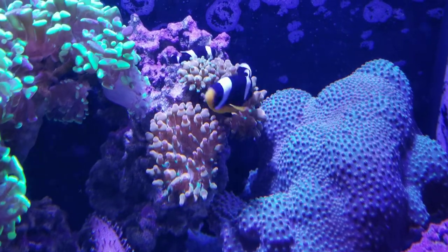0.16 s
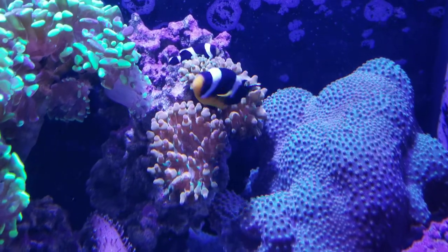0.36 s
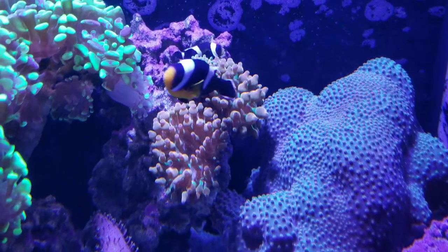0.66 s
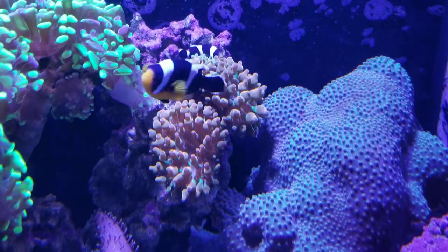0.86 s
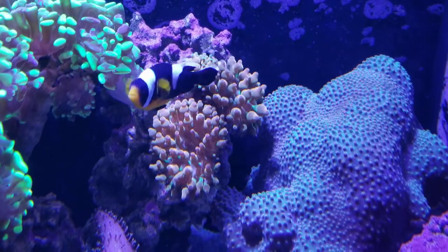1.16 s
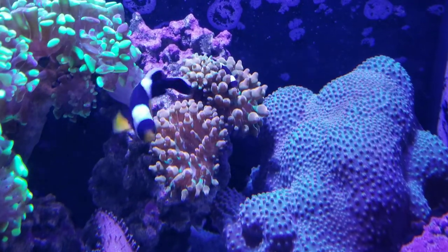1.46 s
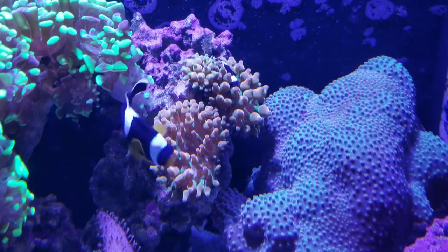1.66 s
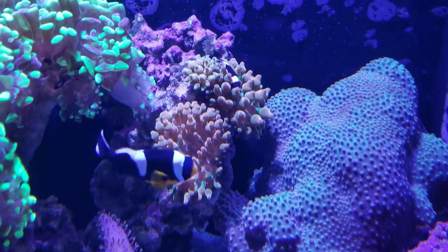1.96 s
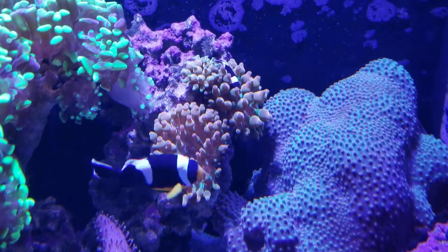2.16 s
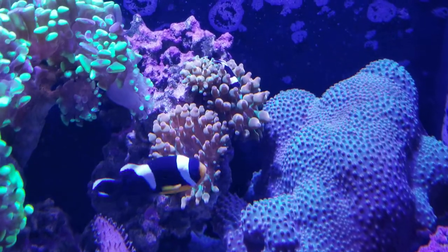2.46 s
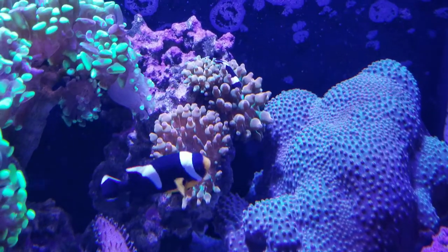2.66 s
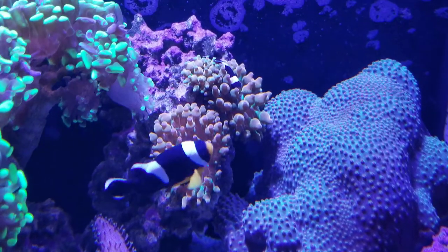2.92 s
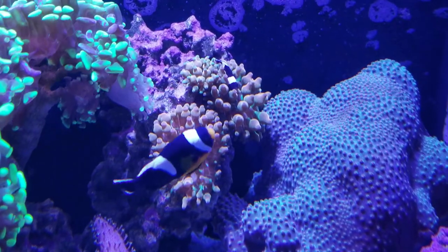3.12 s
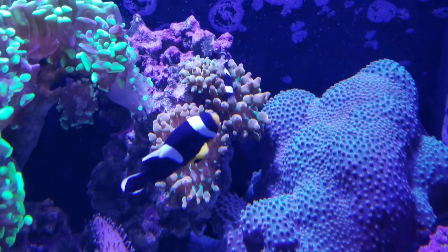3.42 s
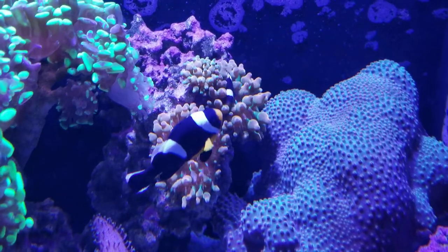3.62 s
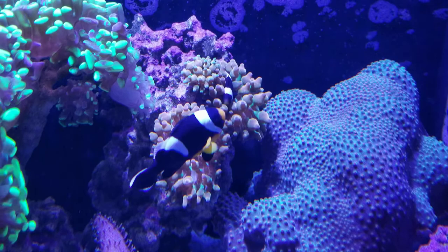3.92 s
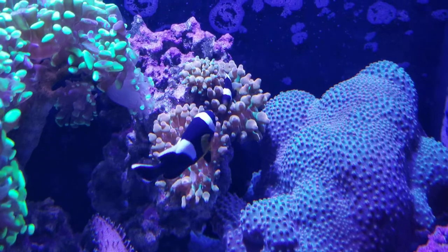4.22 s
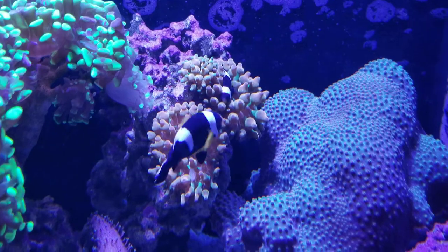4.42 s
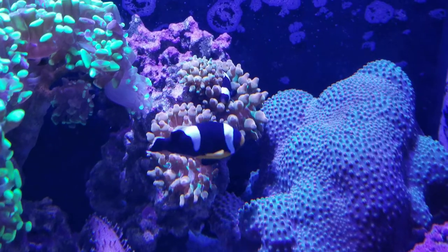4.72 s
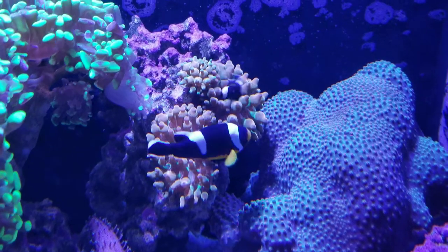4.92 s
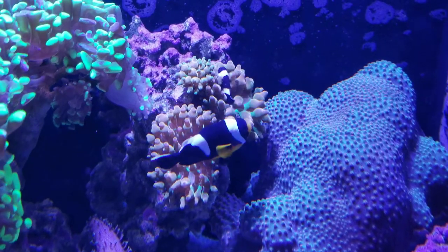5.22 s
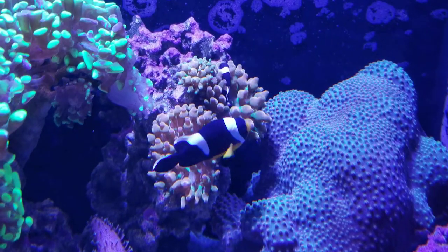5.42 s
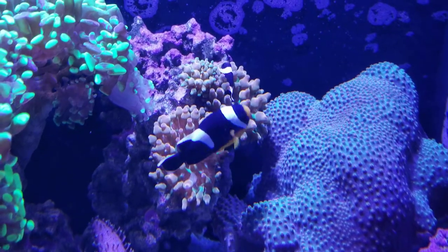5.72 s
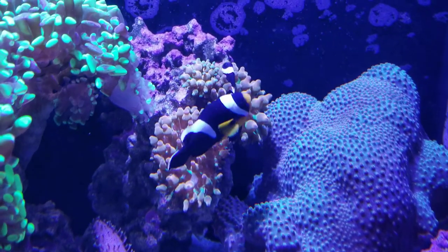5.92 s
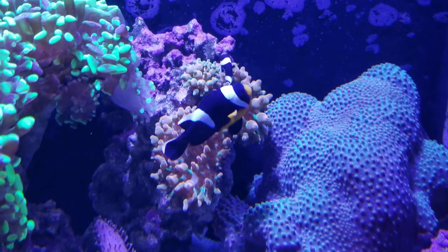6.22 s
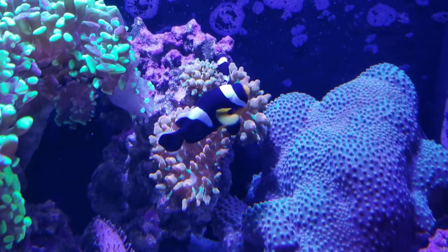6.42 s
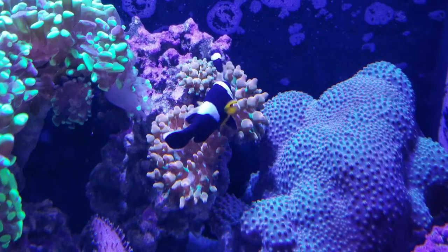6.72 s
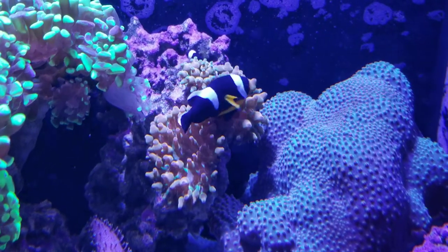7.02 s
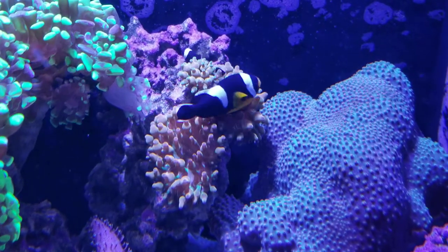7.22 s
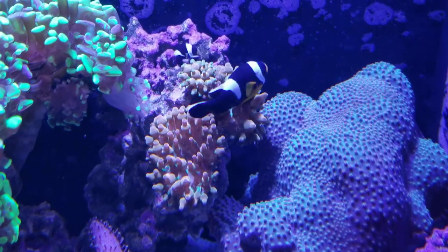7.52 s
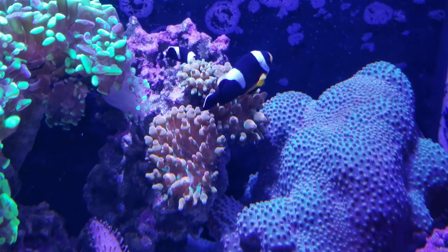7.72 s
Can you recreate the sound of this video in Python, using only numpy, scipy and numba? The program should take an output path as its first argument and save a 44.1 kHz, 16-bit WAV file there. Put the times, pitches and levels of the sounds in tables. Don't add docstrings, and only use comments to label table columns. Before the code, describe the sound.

Water rushes continuously over a low mains hum beside a fish tank, with a buzzing impeller rattle, small high plinks and crisp spray ticks.

```python
import sys
import numpy as np
from scipy import signal
from scipy.fft import rfft, irfft
from scipy.io import wavfile
from scipy.ndimage import uniform_filter1d
from numba import njit

SR = 44100
rng = np.random.default_rng(int(sys.argv[2]) if len(sys.argv) > 2 else 0)


def log_audio(samples):
    frames = np.atleast_2d(samples).T
    limited = np.clip(frames, -1, 1)
    pcm = np.round(limited * 32767).astype(np.int16)
    wavfile.write(sys.argv[1], SR, pcm)


def invert_db(level):
    return 10 ** (np.asarray(level, dtype=float) / 20)


N = 347067
T = np.arange(N) / SR
HZ = np.maximum(np.fft.rfftfreq(N, 1 / SR), 1)

MAINS_HZ, ROTOR_HZ = 60.02, 59.8
SKIP_S, SKIP_CYCLES = 4.012, -.585
RUSH_DB, FIZZ_DB = -41.5, -50
KNOCK_DB, KNOCK_SCATTER_DB, KNOCK_TOP_DB, BACKSTROKE_DB = -30, 6, -20.5, -8.5
HOUSING_HZ, HOUSING_SPREAD_HZ = 2761, 98
PARTNER_HZ, PARTNER_DB, PARTNER_LEAD_S = 123, -1.5, 0.001799
TOP_HZ = 15900

HUM_MULTIPLES = (2, 4, 6, 13, 14, 19, 31, 32, 34, 35, 38)
# level/dB, left minus right/dB
HUM_LINES = [(-41.5, 5.5), (-58.5, 9.5), (-71.5, 24.5), (-81.5, -4), (-73, 18), (-74, 19), (-82, 4),
             (-77, 16), (-74, 2), (-81, 6), (-90, -3)]
# t/s, level/dB
ROTOR_BEAT = [(0.0, -44), (0.15, -49), (0.2, -63), (0.63, -47), (1.05, -60), (1.14, -48), (1.49, -66),
              (1.71, -40), (1.82, -58), (1.88, -45.5), (2.96, -56), (3.6, -44), (4.82, -55.5),
              (5.94, -43.5), (6.14, -53), (7.06, -61), (7.26, -45.5), (7.87, -51)]
# t/s, flow level/dB, splashing level/dB
WATER_FLOW = [
    (0.0, -1, -0.5),
    (1.1, .5, 0),
    (1.75, -.5, 3.5),
    (2.5, 1, 3.5),
    (3.7, 0.5, 4.5),
    (4.2, 0, 1),
    (5.3, .5, 1.5),
    (6.8, 0, 4),
    (7.87, 1, -0.5),
]
# f/Hz, level/dB per Hz
RUSH_SPECTRUM = [(11, -50), (18, -28), (69, -5.5), (122, -8), (143, -4), (168, -7), (246, -14),
                 (289, -19.5), (497, -18), (607, -13.5), (908, -23), (1050, -19.5), (1440, -25),
                 (1730, -23), (2200, -36), (2860, -78), (4840, -120)]
# f/Hz, level/dB per Hz
FIZZ_SPECTRUM = [(1180, -19), (2000, -9), (2320, -6.5), (2590, -3.5), (2770, -5.5), (3160, -5.5),
                 (3780, -11.5), (5620, -15.5), (6970, -12), (8500, -27), (9420, -24.5), (12700, -9.5),
                 (13400, -11.5), (15700, -24)]
# f/Hz, width/Hz, lift/dB
CABINET_MODES = [(36, 5.5, 8), (93, 2.5, 3), (288, 20, -3), (364, 29, 4.5), (433, 12, -7.5), (904, 19, 1),
                 (162, 10, 1.5), (161.2, 3.6, 7), (205, 31, 4), (274, 5.7, 6), (311, 14, 5), (427, 29, 4.5),
                 (455, 14, 4), (521, 6.7, 5.5), (598, 15, 6.5), (635.4, 9.4, 5), (673, 15, 3.5),
                 (707, 27, 5.5), (849, 31, 1.5), (882, 12, 0.5), (933, 17, -8.5), (945, 27, 4.5),
                 (1059, 42, 4.5), (1060, 9.3, -1.5), (1194, 17, 7), (1190, 22, -0.5), (1302, 21, 3.5),
                 (1596, 8.9, 2), (1622, 22, 6), (1760, 46, 6)]
# f/Hz, left minus right/dB, likeness/0-1, left lead/rad
PORT_PAIR = [(30, 2.5, .95, -.2), (200, 4, .88, -.4), (400, 2.5, .7, 0), (600, 8, .7, .6),
             (1200, 4, .35, -2.5), (1370, 9, .3, -3), (1770, 10, .3, -3.5), (2750, 13, .4, -8),
             (3300, 10, .2, -10), (5800, 7, .15, -10), (7600, 16, .1, -10), (10400, 12, .1, -10),
             (12600, 18, .1, -10), (15500, 10, .1, -10)]
# f/Hz, level/dB
MIC_INLET = [(7400, 1.5), (8800, 6), (10500, -1.5), (12500, 0), (13800, -1), (15500, -10)]
# f/Hz, level/dB
BASS_CUT = [(10, -14), (26, -6), (34, -0.5)]
# t/s, peak level/dB
HARD_KNOCKS = [(0.055, -42.5), (0.068, -42), (0.451, -52), (0.4688, -44), (0.7006, -42), (0.819, -44),
               (0.8679, -44), (0.9832, -41.5), (1.4493, -44), (1.5015, -44.5), (1.6427, -43), (1.817, -44),
               (2.3835, -38), (2.816, -42), (3.684, -43), (4.0602, -42), (4.5765, -43.5), (4.677, -39.5),
               (4.96, -42), (5.012, -39.5), (5.4463, -41), (5.6605, -41), (5.711, -43), (6.094, -39.5),
               (6.126, -42.5), (6.2771, -47), (6.808, -44.5), (6.8924, -43), (6.9426, -42), (7.0269, -44)]
# t/s, peak level/dB, f/Hz
CLEAR_BUBBLES = [(0.474, -41, 6700), (0.5933, -42, 7300), (0.6978, -44.5, 6900), (0.7885, -44, 6900),
                 (0.9672, -43.5, 6350), (1.1563, -48, 7000), (1.957, -44.5, 6060), (1.9919, -43, 6760),
                 (2.3116, -45, 6800), (2.4229, -43, 6750), (2.443, -37, 7030), (2.5731, -46, 6720),
                 (2.7671, -47, 6960), (3.1467, -47, 5970), (3.1762, -47, 7590), (3.5982, -50, 6000),
                 (3.66, -45, 6700), (4.0817, -46, 6760), (4.6902, -48, 6370), (4.7471, -38, 6800),
                 (4.9252, -50, 7560), (5.6665, -41, 6100), (5.8694, -41, 7120), (6.2267, -42, 6700),
                 (6.44, -41, 6800), (6.7555, -47, 6790), (6.772, -44, 6770), (7.2733, -44, 7300),
                 (7.424, -47, 7760), (7.8356, -46, 6760),
                 (0.0074, -44, 5240), (1.1074, -47, 4690), (2.2613, -51, 5210), (2.8744, -50, 5210),
                 (3.264, -43, 4200), (3.3054, -48, 4220), (3.8564, -43, 4470), (4.3944, -51, 5200),
                 (4.5765, -44, 4600), (4.7172, -49, 4760), (5.215, -52, 4100), (5.4296, -47, 5200),
                 (5.662, -45, 4660), (5.9519, -47, 5200), (6.0092, -50, 4450), (6.3999, -48, 4930),
                 (7.236, -46, 5030), (7.4594, -41, 4160), (7.6929, -51, 4240), (7.7558, -50, 5100)]
# t/s, peak level/dB, f/Hz
STRONG_SPRAY = [(0.2802, -40, 12400), (1.2047, -45, 12400), (1.3838, -40, 11900), (1.5933, -41, 13400),
                (1.6856, -42, 12000), (2.3231, -41, 12200), (2.4548, -36, 12700), (2.6247, -35, 11900),
                (2.7806, -30.5, 12400), (2.9956, -43, 11900), (3.0131, -40, 13100), (3.063, -34.5, 12600),
                (3.1303, -48, 12300), (3.26, -41, 12700), (3.4276, -39, 12300), (3.4705, -39, 13300),
                (3.485, -32, 12900), (3.6416, -35, 13600), (3.7193, -42, 10400), (3.7594, -41, 12100),
                (4.9801, -45, 12300), (5.1577, -40.5, 11600), (5.3023, -41, 12200), (5.8184, -43, 12700),
                (5.9025, -42, 12100), (6.35, -41, 12700), (7.2539, -41, 13400), (7.3981, -41, 12400),
                (7.4274, -40, 13000), (7.5293, -40, 12300)]


def across(table, col=1):
    rows = np.array(table, float)
    return np.interp(np.log(HZ), np.log(rows[:, 0]), rows[:, col])


def walk(rate):
    k = int(SR / rate)
    steps = np.repeat(rng.standard_normal(N // k + 1), k)
    return 0.73 * uniform_filter1d(uniform_filter1d(steps, k), k)[:N]


@njit
def rings(s, hz, peak, rise_s, t60, glide):
    out = np.zeros(N)
    for k in range(len(s)):
        start = int(s[k] * SR)
        z = peak[k] + 0j
        fall = np.exp(-np.log(1000) / (t60[k] * SR))
        for i in range(start, min(N, start + int(t60[k] * SR))):
            age = (i - start) / SR
            pitch = min(hz[k] * (1 + glide * age / t60[k]), 20000.)
            z *= fall * np.exp(2j * np.pi * pitch / SR)
            out[i] += z.imag * (1 - np.exp(-age / rise_s))
    return out


def ports(near, apart):
    alike = np.clip(across(PORT_PAIR, col=2), 0, 1)
    lag = np.exp(-1j * across(PORT_PAIR, col=3))
    right = alike * lag * near + np.sqrt(1 - alike ** 2) * apart
    return irfft(np.array([near, right * invert_db(-across(PORT_PAIR))]), N)


def mains():
    return MAINS_HZ * T + SKIP_CYCLES * (T > SKIP_S)


def hum():
    s, db = np.transpose(ROTOR_BEAT)
    rotor_level = invert_db(np.interp(T, s, db) + np.array([[2.0], [-2.0]]))
    out = rotor_level * np.sin(2 * np.pi * ROTOR_HZ * T + 2.25 * walk(1.48))
    lag = np.array([[-.3], [0]])
    for multiple, (db, pan_db) in zip(HUM_MULTIPLES, HUM_LINES):
        turn = 2 * np.pi * (multiple * mains() + rng.random())
        level = invert_db(db + 0.44 * walk(3.3) + np.array([[pan_db], [-pan_db]]) / 2)
        out = out + level * np.sin(turn + lag)
    return np.sqrt(2) * out


def water(shape_db, db, flicker_db, rate):
    def path():
        noise = rng.standard_normal(N) * invert_db(flicker_db * walk(rate))
        return rfft(noise) * invert_db(shape_db)

    near, apart = path(), path()
    pair = ports(near, apart)
    return pair * invert_db(db) / np.std(pair[0])


def flow():
    s, flow_db, _ = np.transpose(WATER_FLOW)
    flow_db = np.interp(T, s, flow_db)
    lift_db = sum(db / (1 + (2 * (HZ - hz) / width) ** 2) for hz, width, db in CABINET_MODES)
    rush = water(across(RUSH_SPECTRUM) + lift_db, RUSH_DB + flow_db, flicker_db=1.08, rate=9)
    fizz = water(across(FIZZ_SPECTRUM), FIZZ_DB + flow_db, flicker_db=1.9, rate=14)
    return rush + fizz


def bursts(s, db, hz, t60, spread, rise_s, ring_s, count):
    chance = rng.random((len(s), count, 3))
    follows = np.arange(count) > 0
    late = t60 * chance[..., 0] ** 1.5 * follows / 2
    peak = invert_db(db[:, None] - 60 * late / t60 - 6 * chance[..., 1] * follows)
    pitch = hz[:, None] * (1 + spread * (chance[..., 2] - .5) * follows)
    snap = rings(s, hz, invert_db(db + 2.5), .00003, np.full(len(s), .0012), 0.)
    start = (s[:, None] + late).ravel()
    return snap + rings(start, pitch.ravel(), peak.ravel(), rise_s, np.full(late.size, ring_s), .06)


def crowd(per_s, lo_hz, hi_hz, db, scatter_db):
    chance = rng.random((int(per_s * N / SR), 3)).T
    s, _, splash_db = np.transpose(WATER_FLOW)
    at = chance[0] * N / SR
    level_db = db - scatter_db * chance[1] + np.interp(at, s, splash_db)
    return at, level_db, lo_hz * (hi_hz / lo_hz) ** chance[2]


def with_clear(clear, middling):
    return np.hstack([np.transpose(clear) + [[0], [6.5], [0]], middling])


def spray():
    middling = crowd(3.7, 11100, 14100, db=-37, scatter_db=7)
    s, db, hz = with_clear(STRONG_SPRAY, middling)
    out = bursts(s, db, hz, t60=.15, spread=.3, rise_s=.0003, ring_s=.005, count=45)
    s, db, hz = crowd(40, 10160, 14000, db=-44.5, scatter_db=2)
    return out + bursts(s, db, hz, t60=0.065, spread=0.195, rise_s=0.00025, ring_s=0.0072, count=8)


def bubbles():
    middling = crowd(4.6, 4480, 7540, db=-44.5, scatter_db=8)
    s, db, hz = with_clear(np.array(CLEAR_BUBBLES), middling)
    out = bursts(s, db, hz, t60=.08, spread=.18, rise_s=.0006, ring_s=.013, count=8)
    s, db, hz = crowd(110, 3970, 7770, db=-46.5, scatter_db=19)
    return out + bursts(s, db, hz, t60=.04, spread=.25, rise_s=.0005, ring_s=.009, count=4)


def knock(s, hz, db, rise_s, t60):
    s = np.r_[s, s - PARTNER_LEAD_S]
    hz = np.r_[hz, hz + PARTNER_HZ]
    db = np.r_[db, db + PARTNER_DB]
    return rings(np.maximum(s, 0), hz, invert_db(db), rise_s, np.full(len(s), t60), -.08)


def rattle():
    s, db = np.transpose(HARD_KNOCKS)
    hz = HOUSING_HZ + HOUSING_SPREAD_HZ / 2 * rng.standard_normal(len(s))
    hard = knock(s + .0006, hz, db + 24, rise_s=0.0062, t60=0.012)
    half_cycles = np.floor(2 * mains() - .16)
    beats = np.flatnonzero(np.diff(half_cycles) > 0) + 1
    chance = rng.standard_normal((len(beats), 3)).T
    db = np.minimum(KNOCK_DB + KNOCK_SCATTER_DB * chance[0], KNOCK_TOP_DB)
    db = db + BACKSTROKE_DB * (half_cycles[beats] % 2)
    s = beats / SR + .0008 + .001 * chance[1]
    hz = HOUSING_HZ + HOUSING_SPREAD_HZ * chance[2]
    return hard + knock(s, hz, db, rise_s=0.0046, t60=0.011)


def close_sounds():
    small = spray() + bubbles() + rattle()
    age = T[:8000]
    echoes = rng.standard_normal((2, len(age))) * invert_db(-60 * age / .09)
    wet, apart = (signal.fftconvolve(small, h / np.linalg.norm(h))[:N] for h in echoes)
    direct = small + invert_db(-8) * wet
    colour = invert_db(across(MIC_INLET))
    close = ports(colour * rfft(direct), colour * rfft(apart)) * invert_db(np.array([[0], [-4]]))
    close[:, int(SKIP_S * SR)] += invert_db(np.array([-30, -38]))
    return close


def scene():
    return hum() + flow() + close_sounds()


def roll_off(x):
    return signal.sosfilt(signal.butter(12, 15810, fs=SR, output="sos"), x)


def record(dry):
    band = invert_db(across(BASS_CUT)) * (HZ < TOP_HZ)
    mix = irfft(rfft(dry) * band, N)
    return roll_off(mix)


dry = scene()
out = record(dry)
log_audio(out)
```